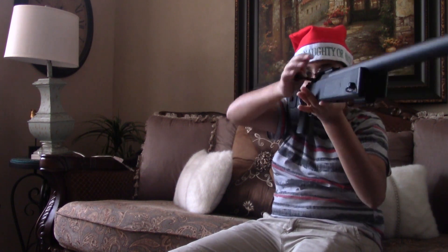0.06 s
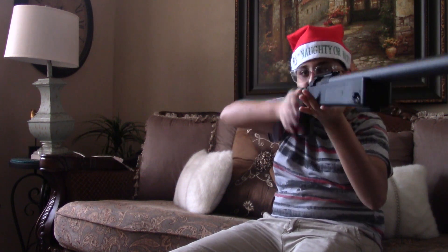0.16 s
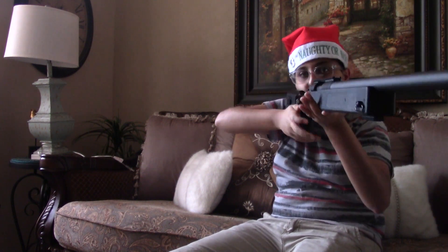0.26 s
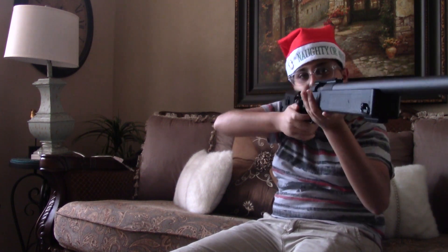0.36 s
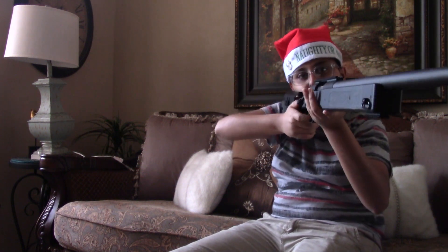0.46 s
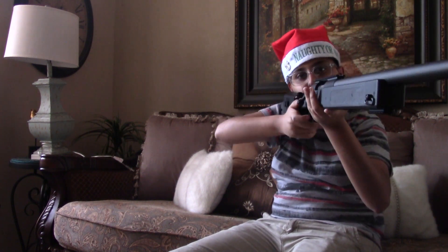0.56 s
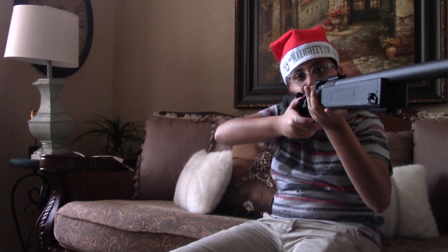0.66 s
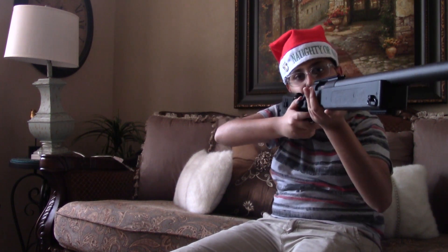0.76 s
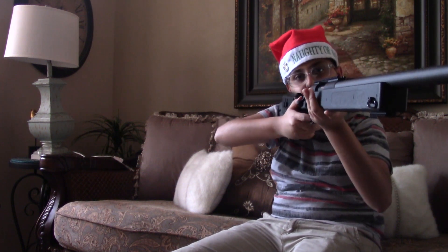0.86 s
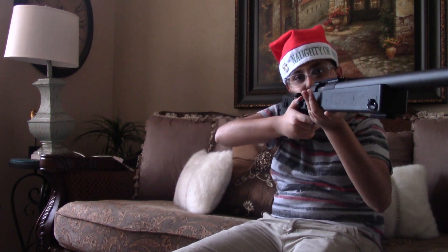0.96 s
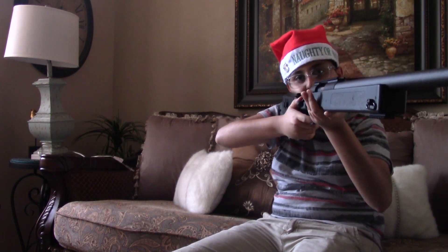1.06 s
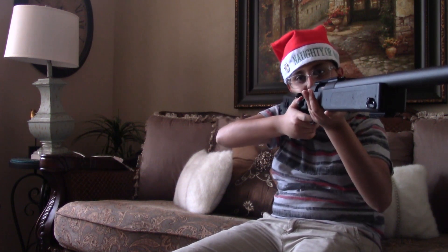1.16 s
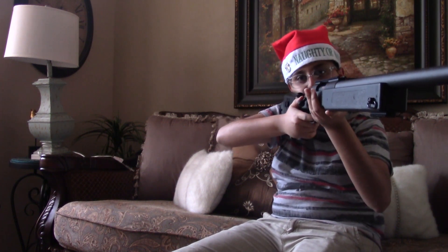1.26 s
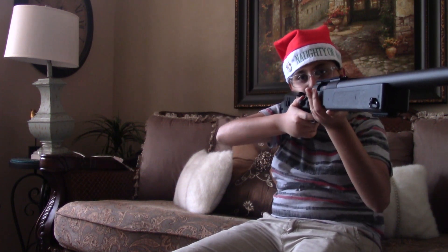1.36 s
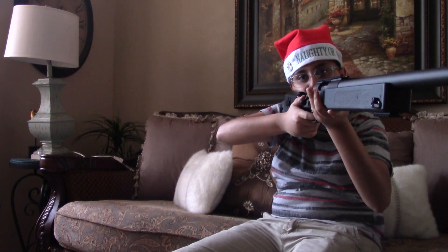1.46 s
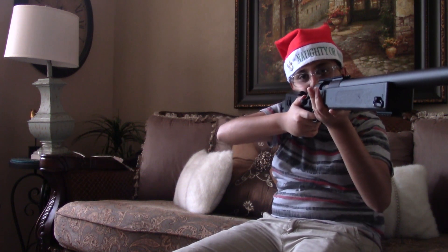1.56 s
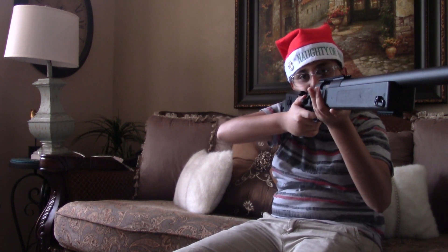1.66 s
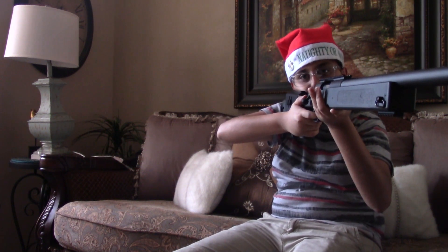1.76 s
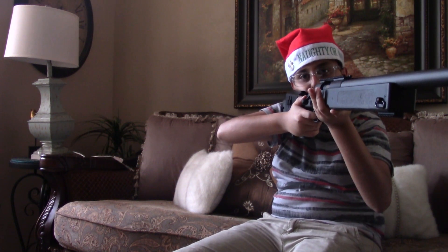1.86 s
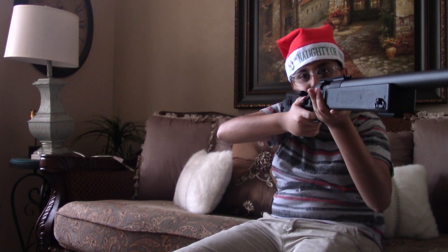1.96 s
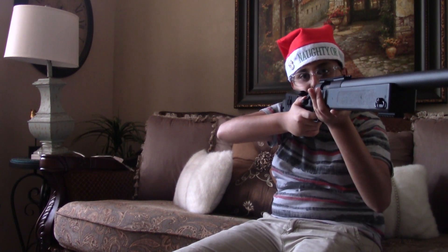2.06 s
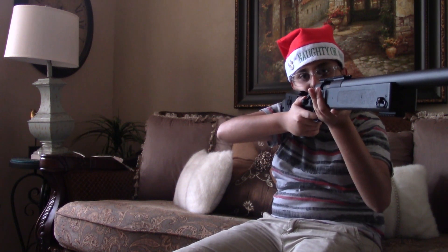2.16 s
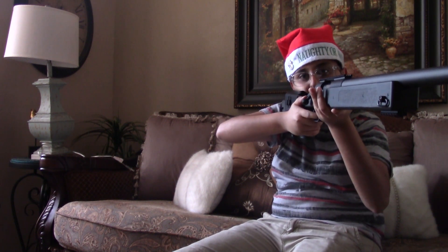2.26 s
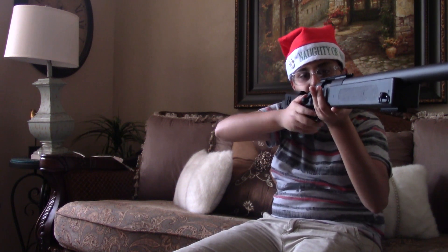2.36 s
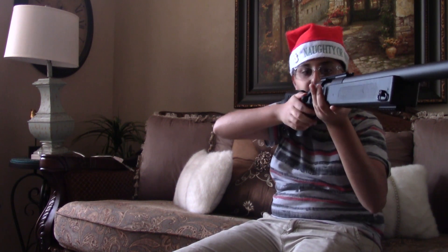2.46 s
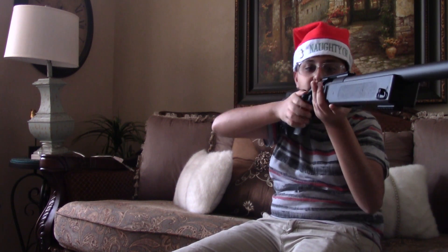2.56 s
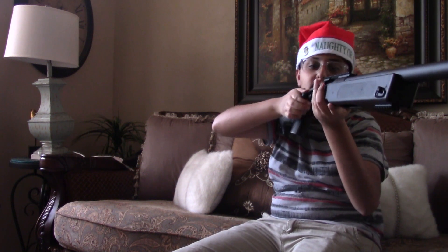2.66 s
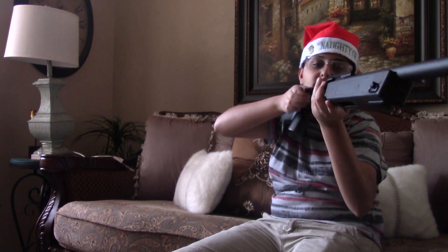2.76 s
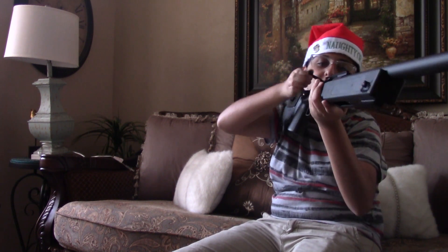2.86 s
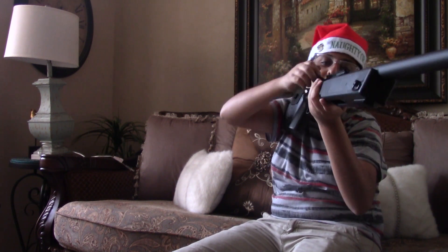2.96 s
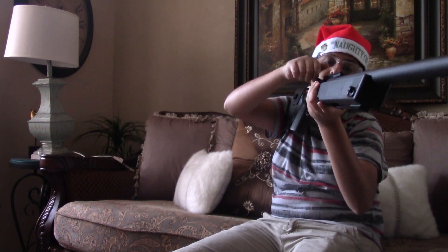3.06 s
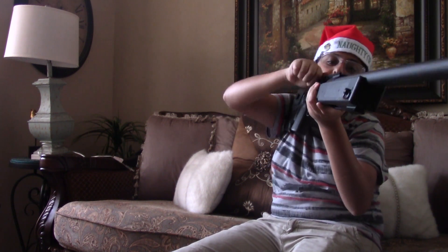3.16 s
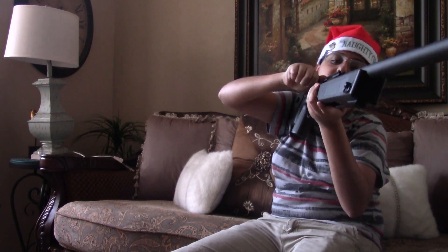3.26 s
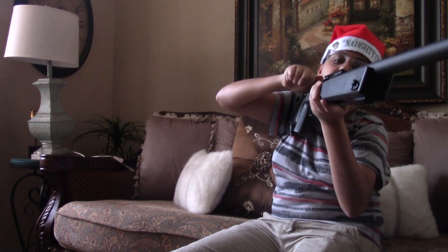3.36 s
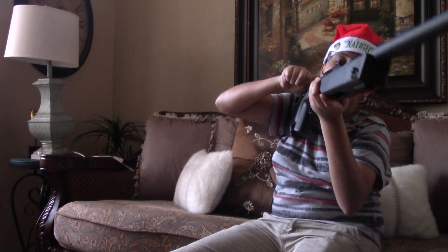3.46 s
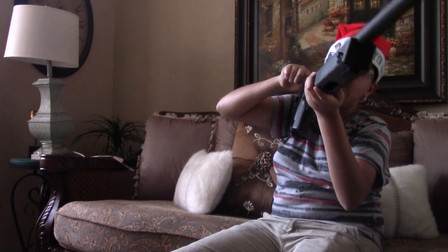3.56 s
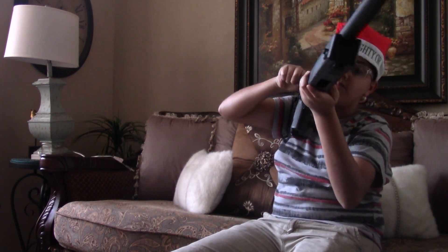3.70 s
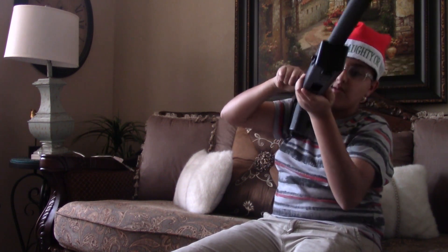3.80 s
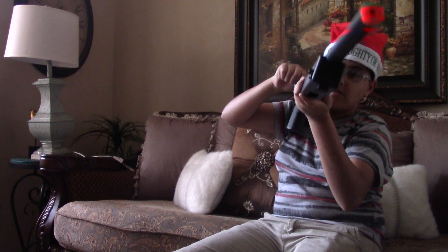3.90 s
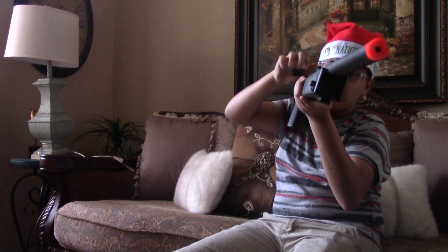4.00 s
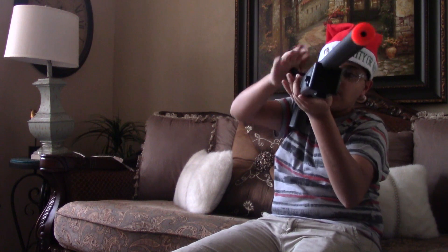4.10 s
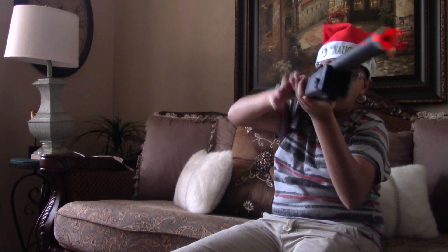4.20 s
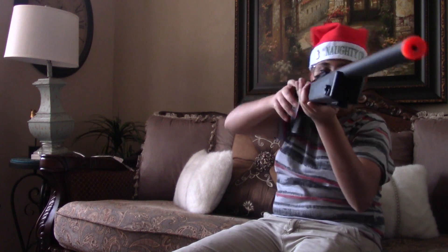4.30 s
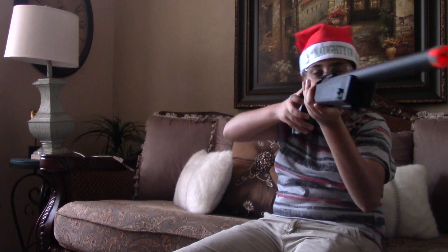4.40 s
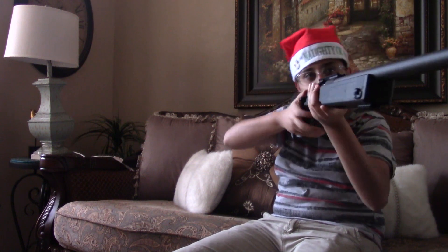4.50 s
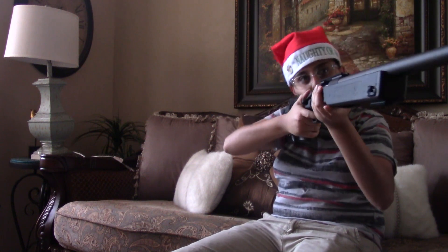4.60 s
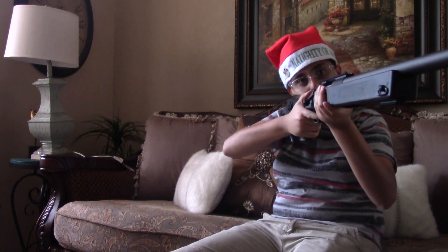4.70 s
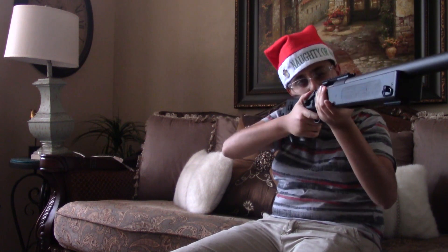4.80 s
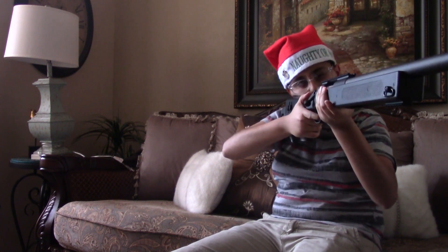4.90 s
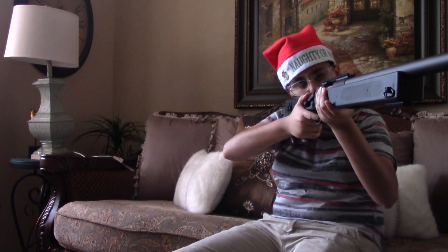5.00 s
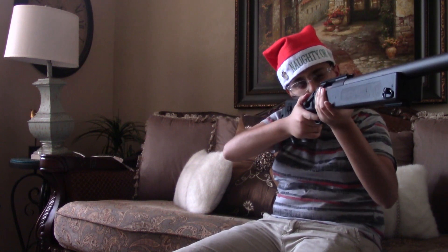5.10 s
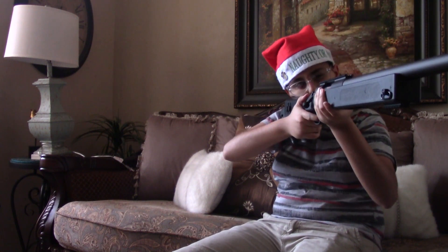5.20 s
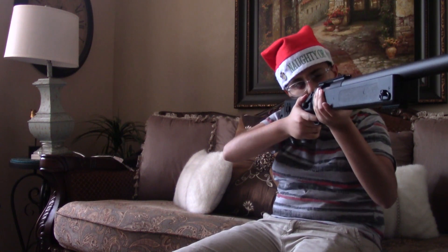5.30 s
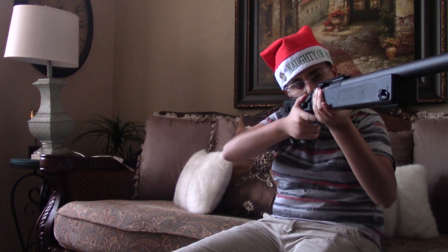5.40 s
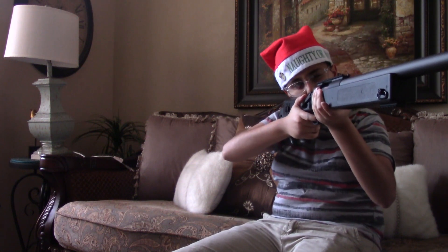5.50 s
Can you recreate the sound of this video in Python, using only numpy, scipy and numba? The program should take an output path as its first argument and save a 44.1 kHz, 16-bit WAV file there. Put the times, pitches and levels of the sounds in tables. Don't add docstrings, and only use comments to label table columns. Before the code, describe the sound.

In a furnished living room, a spring toy rifle's bolt scrapes and slams shut in a rapid clatter, with a bright latch click. Quiet hiss and faint camera motor ticks follow. At two seconds a loud, short air snap bursts out with room echo. The bolt is then lifted, drawn back and closed with harsh clicks, picked up by a small bass-light camera microphone.

```python
import sys
import numpy as np
from scipy import signal
from scipy.fft import rfft, irfft, next_fast_len
from scipy.io import wavfile
from scipy.ndimage import uniform_filter1d
from numba import njit

SR = 44100
rng = np.random.default_rng(int(sys.argv[2]) if len(sys.argv) > 2 else 0)


def elevation(decibels):
    levels = np.asarray(decibels, float)
    return 10 ** (levels / 20)


def store_wav(level_fs):
    pcm = np.round(np.clip(np.atleast_2d(level_fs), -1, 1) * 32767)
    wavfile.write(sys.argv[1], SR, pcm.T.astype(np.int16))


N = 244583

# f/Hz, density/dB
HUSH_MID = [(12, -50.5), (20, -24.5), (243, -4), (563, -6.5), (648, -9.5), (705, -9.5), (789, -10.5),
            (858, -11), (1460, -16), (1830, -16.5), (2160, -17.5), (2630, -19), (5620, -24), (13400, -34),
            (16300, -46)]
# f/Hz, density/dB
HUSH_SIDE = [(12, -43.5), (20, -21.5), (194, 2.5), (666, -2.5), (1780, -11.5), (2230, -10), (3120, -17),
             (14200, -34), (16300, -49.5)]
HUSH_DB = -55

# start t/s, end t/s, first level/dB, last
# level/dB, rumble over scrape/dB
SLIDES = [(0, 0.034, -26, -48, 1), (0.026, 0.083, -45.5, -33, 1.5), (0.83, 1.008, -65, -81, 6.5),
          (2.436, 2.6, -55.5, -81, 6.5), (2.723, 2.798, -65, -85, 1), (2.859, 2.88, -47, -72, 6.5),
          (2.898, 2.947, -73, -32, 4), (3.298, 3.313, -67, -30.5, -2), (3.319, 3.335, -36.5, -26, 8.5),
          (3.359, 3.466, -32.5, -45.5, 8.5), (3.473, 3.546, -41, -52, 11.5),
          (3.884, 3.933, -70, -32.5, 2.5), (4.02, 4.097, -51, -40.5, 2.5), (4.099, 4.152, -25, -31, -10.5),
          (4.504, 4.75, -52.5, -70, 10)]
# f/Hz, density/dB
SCRAPE = [(1180, -29.5), (2000, -3.5), (2130, -8.5), (3490, -7), (4410, -3.5), (5350, -10.5), (6310, -7),
          (10900, -17), (16000, -29.5)]

# t/s, whir level/dB
HUNTS = [(.3, -57.5), (4.35, -54.5)]
SETTLE_S = 3.1
FIELD_S = 1.001 / 60

# f/Hz, width/Hz, level/dB
STOCK = [(334, 234, -3), (717, 201, 3), (1152, 320, -1)]
# f/Hz, width/Hz, level/dB
SHELL = [(1400, 550, -3.1), (2090, 720, -5)]
# f/Hz, width/Hz, level/dB
LATCH = [(2950, 3820, -0.98), (4344, 3270, 4.5), (5320, 2650, 0.82)]
# f/Hz, width/Hz, level/dB
STEEL = [(6830, 2600, 4), (10060, 3100, 5), (13220, 3500, 0.5)]
SHELL_FOLLOWS = 0.23

# t/s, peak
# level/dB, weight into the stock/dB, ringing/dB
CLICKS = [(.133, -11, -7, -12), (.2469, -10.5, -20, 3), (.258, -23, -8, -11.5), (.465, -20, 7.5, -10),
          (.6794, -51.5, 12, -14), (2.434, -57, 5, -3), (2.4624, -49, 23, -6), (2.8539, -46.5, 15, -10),
          (2.9244, -36, -12, 14), (2.9397, -28, 10, -15), (3.306, -34, -5, -12), (3.5567, -15, 7, -8),
          (4.066, -41, -10, -14), (4.287, -14, -6, -1), (4.298, -34, -8, -9.5), (4.3794, -12, 1, -10)]
# t/s, peak level/dB, weight into the stock/dB, ringing/dB
SLAMS = [
    (.0894, -6, -5, 6),
    (4.154, -6, 0, -2.5),
]
# t/s, peak level/dB, weight into the stock/dB, ringing/dB
REBOUNDS = [(.0932, -8, -5.5, -7), (.1041, -6, -14, -9), (.1105, -10.5, -3, -5), (.1135, -13.5, -2.5, -14),
            (.124, -13, 0, 10), (4.1635, -7, 2, 3), (4.1764, -5, 1, 8), (4.1894, -20.5, 15, 5)]
# t/s, peak level/dB, weight into the stock/dB, ringing/dB
LOCKS = [(.2633, -3, -1, 1), (3.3453, -15, 4.5, -2), (4.303, -4, 5, -1.3)]
# t/s, peak level/dB, weight into the stock/dB, ringing/dB
LIFTS = [(2.663, -48.5, -9, 11.5), (2.9486, -14, -1.5, 3.5)]
# t/s, peak level/dB, weight into the stock/dB, ringing/dB
CATCHES = [(.2643, -15.5, -8, 8), (3.5691, -18.5, 1, -25), (3.924, -12, 1.5, 5.5), (3.935, -21, 1, 8),
           (3.9544, -21.5, -3, -2), (4.1005, -29, 0, -13)]
# t/s, peak level/dB, weight
# into the stock/dB, ringing/dB
KNOCKS = [(.2824, -20.5, 8, -1), (.8535, -42, 0.5, 0), (2.9619, -38.5, 11.5, -16), (3.3119, -39, -10, -12),
          (3.3225, -25, -10, 3), (3.3574, -23.5, -7, -12), (3.4812, -30, -0.5, 10), (3.7444, -49, 4.5, 3.5),
          (4.3194, -17, -2.5, 0), (4.5146, -34, -10, -20), (4.6895, -53.5, -2.5, -10)]
# t/s, peak level/dB, weight into the stock/dB, ringing/dB
GRIPS = [(2.7053, -54, 3, 14.5), (2.7232, -35.5, -5.5, -8), (2.8732, -41.5, 2, -12), (2.8923, -42, 2, -13),
         (2.9058, -34, -2.5, -16), (3.2895, -51.5, 17.5, -12), (3.8985, -48, -15, -4), (3.9124, -33, 1, -2)]
# t/s, peak level/dB, weight into the stock/dB, ringing/dB
PINS = [(.092, -36, -6, -1), (3.352, -36.5, 0, -1.5), (4.1556, -38, -2.5, 4), (4.304, -44, 3, -1)]
# t/s, peak level/dB, weight into the stock/dB, ringing/dB
BUMPS = [(.824, -62, 8, 16), (.9789, -63.5, 9, 12.5), (2.5294, -52.5, -4, 1.5), (2.555, -62, 2, 3)]

# f/Hz, width/Hz, level/dB, delay t/s
SLAM_RINGS = [(1193, 220, 2.5, 0.002984), (312, 69, -10, 0.00415), (1942, 310, -2, 0.00203)]
REBOUND_RINGS = [(1239, 300, -0.5, 0.00082)]
LOCK_RINGS = [(766, 65, -4, 0.00211), (3413, 400, -17, .001)]
LIFT_RINGS = [(4200, 125, -11.5, .0015), (5560, 280, -11, 0.00091), (7200, 150, -25, 0.00074)]
CATCH_RINGS = [(3580, 480, 5, .0006)]
CLICK_RINGS = [(3770, 520, -5, .0006)]
KNOCK_RINGS = [(1710, 460, 9, .001), (920, 270, 2, 0.0024)]
BUMP_RINGS = [(780, 69, 10, 0.00085)]
GRIP_RINGS = [(2900, 130, -1, 0.00052)]
PIN_RINGS = [(12060, 110, 13, 0.00066)]
# (stock level/dB, shell level/dB, bright edge level/dB, room send/dB)
FAMILIES = [(SLAMS, SLAM_RINGS, (-8, -2, -14.5, -0.5)), (REBOUNDS, REBOUND_RINGS, (-9.5, -7, -10, -4)),
            (LOCKS, LOCK_RINGS, (-11.5, -12.5, -10, 1)), (LIFTS, LIFT_RINGS, (-9, -6, -5.5, -4.5)),
            (CATCHES, CATCH_RINGS, (-18, -8.5, -15.5, 1)), (CLICKS, CLICK_RINGS, (-24.5, -12, -6, -3)),
            (KNOCKS, KNOCK_RINGS, (-2, 3.5, -10, 3)), (BUMPS, BUMP_RINGS, (2, 5, -12, -1)),
            (GRIPS, GRIP_RINGS, (-10, -10, -15.5, -0.5)), (PINS, PIN_RINGS, (-17, -17, -1, -2))]

# f/Hz, time to fall by 60 dB t/s
ROOM = [(100, 0.35), (260, 0.54), (700, 0.51), (1800, 0.55), (5000, 0.48), (13000, 0.3)]
# f/Hz, level/dB
WALLS = [(100, -9), (400, -1.5), (1500, -1.8), (5000, 0.5), (15000, -2.5)]
TAILS = 6

# f/Hz, density/dB
BLAST = [(25, -47), (108, -22.5), (150, -2), (279, -7), (356, -0.5), (494, -4.5), (581, -4), (1630, -4),
         (2050, -1.5), (2700, -6), (11500, -12), (14600, -23), (16300, -43)]
# t/s, level/dB, width t/s
PUSHES = [
    (1.9955, 6, 0.00061),
    (1.9993, 8.5, 0.00024),
]

# f/Hz, level/dB
WIDTH = [(30, -4), (150, -28.5), (700, -27), (1500, -24), (3000, -18.5), (6000, -12), (10000, -12.5),
         (14000, -6.5)]
# f/Hz, level/dB
MIC = [(20, -29.5), (70, -13), (130, -6), (220, -0.65)]
# f/Hz, level/dB
TOP = [(13000, 0), (15500, -.5), (16100, -5), (16400, -12), (16500, -60)]


def unit(x):
    return x / np.sqrt(np.mean(x ** 2) + 1e-20)


def along(points, hz):
    f, v = np.transpose(points)
    return np.interp(np.log(hz + 1), np.log(f + 1), v)


def filtered(x, response):
    n = x.shape[-1]
    m = next_fast_len(n + 8192)
    return irfft(rfft(x, m) * response(np.fft.rfftfreq(m, 1 / SR)), m)[..., :n]


def coloured(x, spectrum):
    return filtered(x, lambda hz: elevation(along(spectrum, hz)))


def body(x, modes):
    def response(f):
        total = 0
        for k, (centre, width, db) in enumerate(modes):
            damping = 1j * f * width
            total = total + (-1) ** k * elevation(db) * damping / (centre * centre - f * f + damping)
        return total
    return filtered(x, response)


def hush():
    z = signal.stft(rng.standard_normal((2, N)), nperseg=512)[2]
    patches = uniform_filter1d(rng.standard_normal(z.shape[1:]), 5, 0)
    patches = uniform_filter1d(patches, 12, 1)
    mid, side = signal.istft(z * elevation(0.8 * unit(patches)), nperseg=512)[1][:, :N]
    mid = unit(coloured(mid, HUSH_MID))
    side = elevation(-5.5) * unit(coloured(side, HUSH_SIDE))
    return elevation(HUSH_DB) * np.array([mid, side])


def slide():
    t = np.arange(N) / SR
    roughness = unit(uniform_filter1d(rng.standard_normal(N), 90))
    grains = rng.standard_normal(N) * elevation(3.8 * roughness)
    scrape = unit(coloured(grains, SCRAPE))
    rumble = unit(body(grains, STOCK) + body(grains[::-1], SHELL))
    rub = np.zeros(N)
    for start, end, first_db, last_db, rumble_db in SLIDES:
        stroke = elevation(np.interp(t, [start, end], [first_db - 7, last_db - 4], -120, -120))
        rub += stroke * (scrape + elevation(rumble_db) * rumble)
    return rub


def focus_motor():
    t = np.arange(N) / SR
    fields = (np.arange(-8, 31)[:, None] * 9 + [0, 2, 4, 6]).ravel()
    at = np.round((1.066 + fields * FIELD_S) * SR).astype(int)
    active = (at > 0) & (at < N) & ((at < 2 * SR) | (at > 4.6 * SR))
    kicks = np.zeros(N)
    kicks[at[active]] = elevation(-17.5 + 2.4 * rng.standard_normal(len(at)))[active]
    ticks = body(body(kicks, [(2230, 170, 0), (1700, 150, -10)]), [(2200, 800, 0)])
    effort = elevation(-69.5)
    for s, db in HUNTS:
        effort = effort + elevation(db - 60 * np.abs(t - s) / SETTLE_S) * (t > s)
    whir_mode = [(1374, 220, 0)]
    whir = unit(body(body(rng.standard_normal(N), whir_mode), whir_mode))
    return ticks + effort * whir


def contacts():
    direct, sends = np.zeros(N + 8192), np.zeros((TAILS, N + 8192))
    t = np.arange(4096) / SR
    fading = elevation(-60 * t / 0.02) * (1 - np.exp(-t / 0.00037))
    tap = np.linalg.norm(fading) * (t == 0)
    blows = [(row, mix, rings) for rows, rings, mix in FAMILIES for row in rows]
    force = np.vstack([tap, rng.standard_normal((len(blows), len(t))) * fading])
    parts = np.array([body(body(force, modes), modes) for modes in (LATCH, STOCK, SHELL, STEEL)])

    for k, (row, mix, rings) in enumerate(blows):
        s, db, weight_db, ring_db = row
        stock_db, shell_db, edge_db, send_db = mix
        part_levels = np.array([1.5, stock_db + weight_db + 6.5,
                                shell_db + SHELL_FOLLOWS * weight_db + 2.06, edge_db + 4.0])
        at = round(s * SR) - 10
        for j, level in enumerate(elevation(db + part_levels)):
            heard, thrown = parts[j, k + 1], parts[j, 0]
            gain = level / np.abs(heard).max()
            direct[at:at + len(t)] += gain * heard
            sends[(k + j) % TAILS, at:at + len(t)] += elevation(send_db) * gain * thrown
        for j, (hz, width_hz, part_db, late_s) in enumerate(rings):
            decay = np.exp(-np.pi * width_hz * t) * (1 - np.exp(-hz * t))
            ring = elevation(db + ring_db + part_db) * np.sin(2 * np.pi * hz * t) * decay
            begin = round((s + late_s) * SR)
            direct[begin:begin + len(t)] += ring
            sends[(k + j) % TAILS, begin:begin + len(t)] += elevation(2.5) * ring
    return direct[:N], sends[:, :N]


def room(sends, gap, rise, early):
    hz, t, z = signal.stft(rng.standard_normal((len(sends), 2, SR)), SR, nperseg=256)
    decay = elevation(-60 * t / along(ROOM, hz)[:, None])
    tail = signal.istft(z * decay, SR, nperseg=256)[1]
    t = np.arange(tail.shape[-1]) / SR
    arrival = 1 - np.exp(-np.maximum(t - gap, 0) / rise)
    tail = tail * (1 + early * elevation(-60 * t / 0.11)) * arrival
    tail = tail / np.linalg.norm(tail, axis=-1, keepdims=True)
    return signal.fftconvolve(sends[:, None], tail, axes=-1).sum(axis=0)[:, :N]


def shot():
    t = np.arange(N) / SR
    swell_s = [1.9845, 1.987, 1.991, 1.9945, 1.997, 2.0, 2.004, 2.02]
    swell_db = [-63.5, -30, -5.5, -16.5, -13.5, -10.5, -15, -44.0]
    swell = elevation(np.interp(t, swell_s, swell_db, -150, -150))
    jet = unit(body(rng.standard_normal(N), [(2500, 2700, -0.5), (9590, 4100, -0.5)]))
    puffs = np.zeros(N)
    for s, db, width in PUSHES:
        u = np.abs(t - s) / width
        puffs += elevation(db) * (1 - u) * np.exp(-u) * (t >= s)
    piston = 1.0 * (np.arange(N) == round(1.997 * SR))
    bang = coloured(piston, BLAST)
    thump = body(body(piston, [(156, 6, 0)]), [(150, 73, 0)])
    boom = elevation(-19) * thump / np.abs(thump).max()
    return swell * jet + puffs + boom, elevation(21.5) * bang / np.linalg.norm(bang)


def scene():
    direct, sends = contacts()
    rub = slide()
    puff, bang = shot()
    sends[0] += elevation(1.0) * rub
    walls = elevation(-0.5) * coloured(room(sends, gap=0.00077, rise=0.0085, early=3.36), WALLS)
    mid, side = walls + room(bang[None], gap=0.0013, rise=0.032, early=0.48)
    near = direct + rub + puff
    side = coloured(side - elevation(-11.0) * near, WIDTH)
    mid, side = coloured(np.array([mid + near, side]), MIC) + hush()
    mid = mid + focus_motor()
    return np.array([mid + side, mid - side])


@njit
def limiter_gain(need, attack, release):
    gain, g = np.empty_like(need), 1.0
    for i in range(len(need)):
        g += (need[i] - g) * (attack if need[i] < g else release)
        gain[i] = g
    return gain


def top_cut(x):
    return signal.sosfilt(signal.butter(12, 16460, fs=SR, output="sos"), x)


def record(dry):
    need = np.minimum(1, 0.66 / (np.abs(dry).max(axis=0) + 1e-9))
    attack_s, release_s = 0.00064, 0.055
    held = dry * limiter_gain(need, 1 / (1 + attack_s * SR), 1 / (1 + release_s * SR))
    held = held / (1 + np.abs(held) ** 8) ** (1 / 8)
    return top_cut(coloured(held, TOP))


dry = scene()
out = record(dry)
store_wav(out)
```